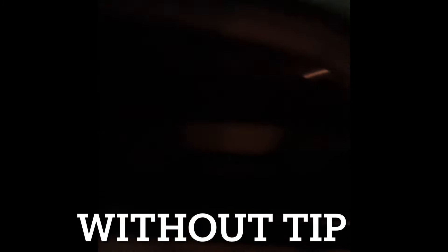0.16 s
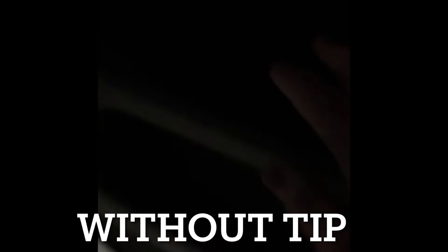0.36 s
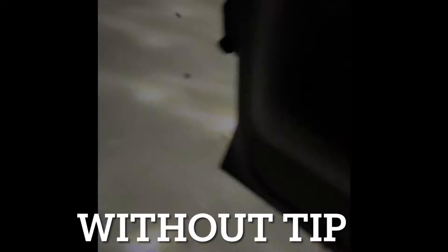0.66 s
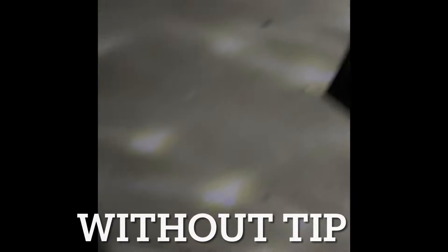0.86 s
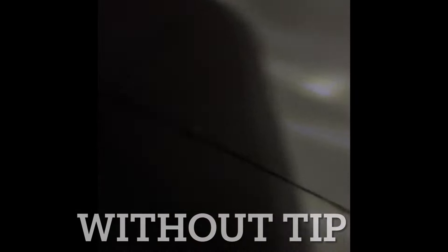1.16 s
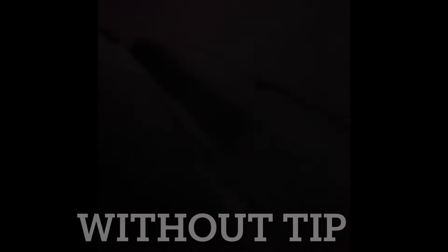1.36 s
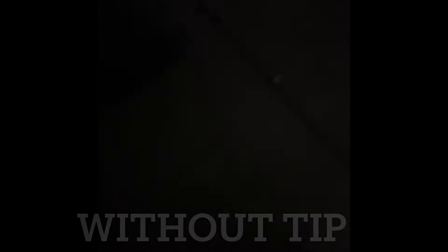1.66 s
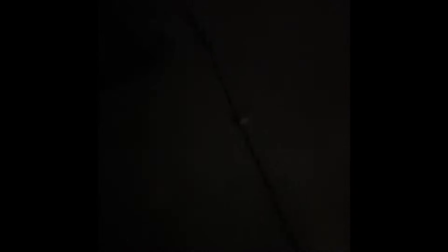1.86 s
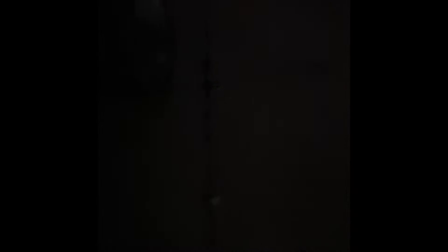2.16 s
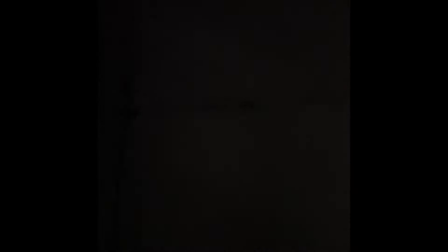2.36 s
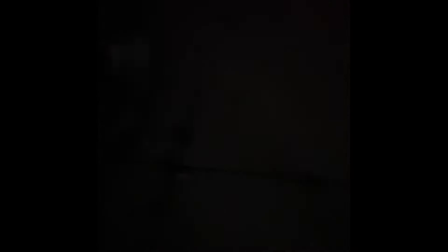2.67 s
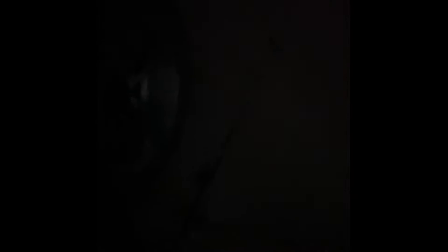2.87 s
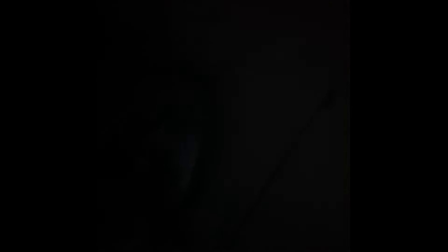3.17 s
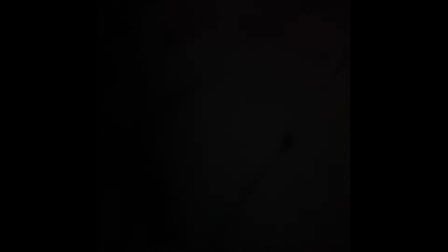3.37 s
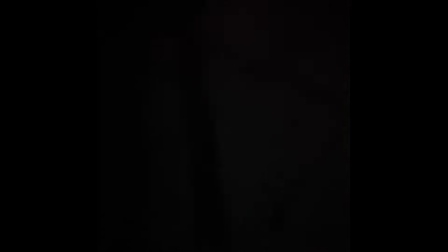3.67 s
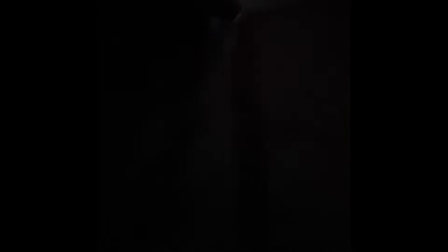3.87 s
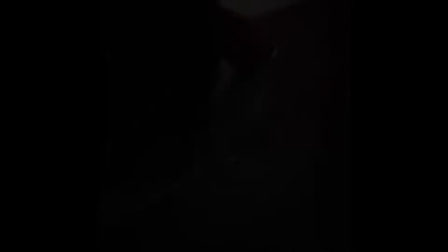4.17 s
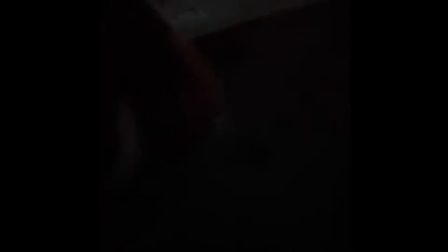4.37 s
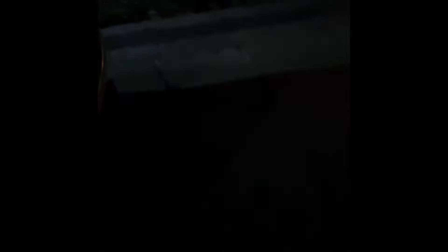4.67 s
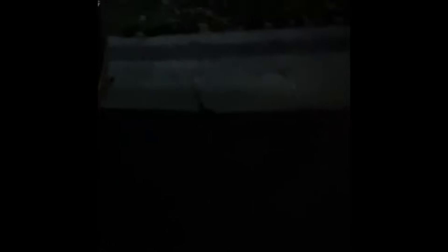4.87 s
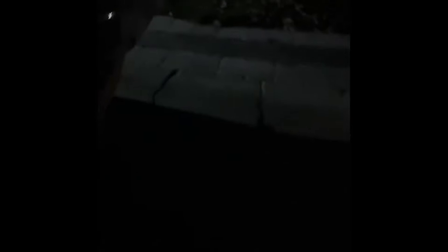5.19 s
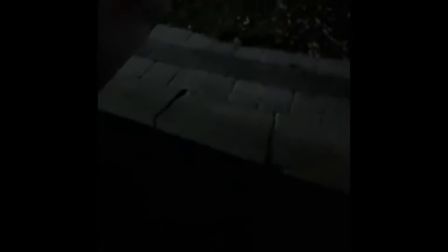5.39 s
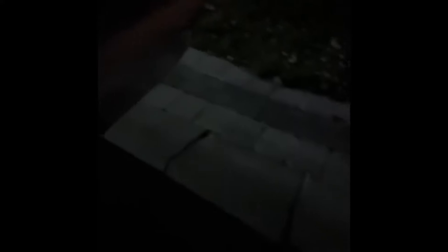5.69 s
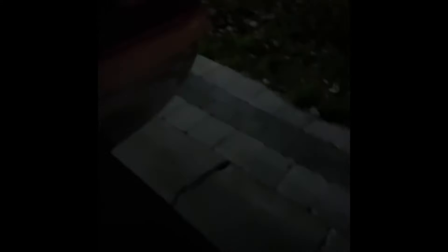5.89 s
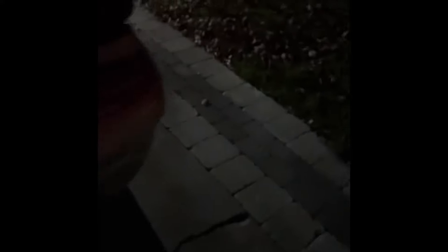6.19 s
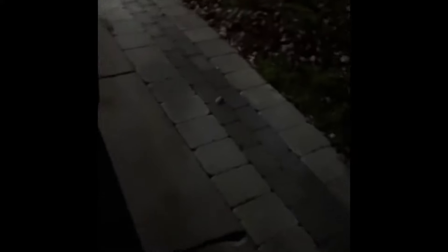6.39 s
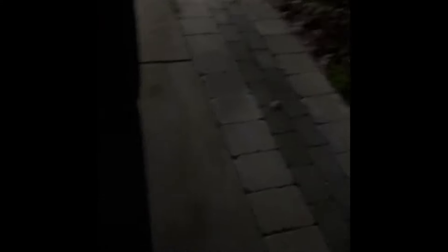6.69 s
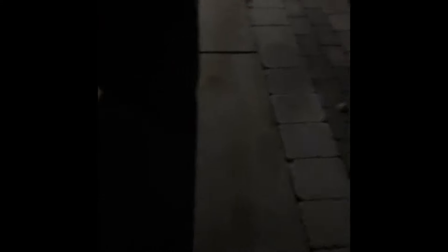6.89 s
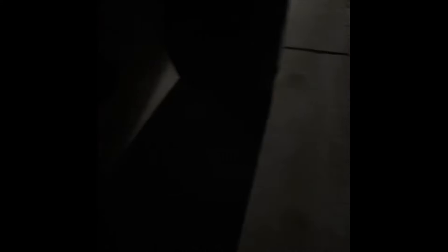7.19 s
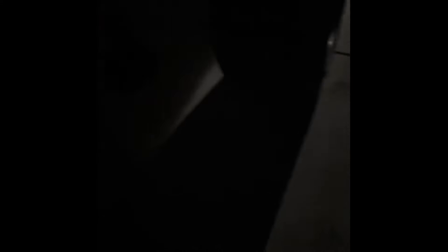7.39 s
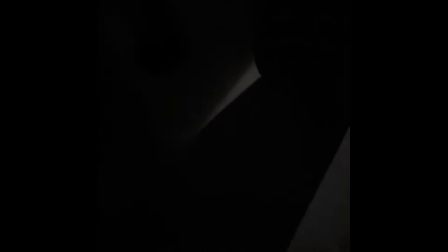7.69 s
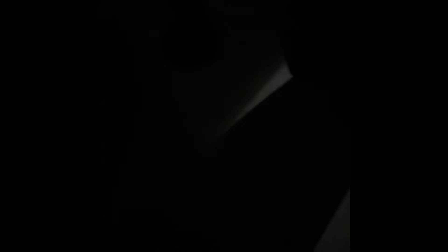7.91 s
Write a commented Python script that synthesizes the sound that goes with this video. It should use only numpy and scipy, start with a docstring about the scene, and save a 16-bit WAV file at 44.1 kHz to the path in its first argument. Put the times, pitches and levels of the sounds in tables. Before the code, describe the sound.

A heavy eight-cylinder diesel truck idles throughout, its firing a fast low throb of about fifty beats a second, hunting slightly. From 0 to 0.7 s it is heard from the cab by an open door: dark, boomy drone, with a brief dry double snap of trim near 0.2 s. Around 0.7 to 1.2 s the listener steps outside; the boom flickers and dips, and the sound opens into airy engine noise. A light metallic valve tick, about seven a second, is clearest near 0.7 s and again around 1.7 to 2.4 s, fading by 3 s. Along the flank, 2 to 5 s, the boom rises and drops while narrow hollow resonances shift. From 5 s the gas rush and clatter grow, strongest around 6 to 7.2 s at the tailpipe, bright, breathy and rough, then ease slightly until 8 s. Close handheld stereo, treble dulled.

```python
"""Idle boom of an eight-cylinder diesel truck, hunting a little in speed, first in the cab, then outside.
The listener walks along the flank to the tailpipe: the boom rises and falls, the rush of gas grows.
Exhaust: sines on multiples of the engine cycle, with rumble and cab drone as filtered noise.
Rush: noise puffed by each firing, combed by an echo off the paving, levelled in four bands.
Under it a valve tick once a cycle, a clatter at each firing and a double snap of cab trim."""
import sys
import numpy as np
from scipy import signal
from scipy.fft import rfft, irfft, next_fast_len
from scipy.io import wavfile
from scipy.ndimage import uniform_filter1d, map_coordinates

SR = 44100
rng = np.random.default_rng(int(sys.argv[2]) if len(sys.argv) > 2 else 0)


def waveform_to_disk(signal):
    """Save audio, clipped to [-1, 1], as 16-bit WAV at the path in sys.argv[1]."""
    frames = np.transpose(np.atleast_2d(signal))
    scaled = np.clip(frames, -1, 1) * 32767
    samples = np.round(scaled).astype(np.int16)
    wavfile.write(sys.argv[1], SR, samples)


N = 355005


def gain_of(db):
    """Decibels to an amplitude factor."""
    return 10 ** (np.asarray(db) / 20)


def evened(x):
    """Scales to rms 1."""
    return x / np.sqrt(np.mean(x ** 2) + 1e-20)


def curves(rows, t=None):
    """Every column of a time table, by default one value a sample."""
    t = np.arange(N) / SR if t is None else t
    row_s, *columns = np.transpose(rows)
    return [np.interp(t, row_s, column) for column in columns]


def read(points, at_hz):
    """Level of a spectrum table, interpolated on log frequency."""
    hz, db = np.transpose(points)
    return np.interp(np.log(at_hz + 1), np.log(hz + 1), db)


def coloured(x, points, turn=1):
    """Filters x by a spectrum table; turn rotates the phase (1j: a quarter turn)."""
    size = next_fast_len(N)
    gain = gain_of(read(points, np.fft.rfftfreq(size, 1 / SR)))
    return irfft(rfft(x, size) * gain * turn, size)[..., :N]


def drift(per_s, t, count):
    """Slow random wander of rms 1: noise at 40 knots a second, averaged twice."""
    knots = rng.standard_normal((count, int(N / SR * 40) + 9))
    width = max(int(20 / per_s), 1)
    knots = uniform_filter1d(uniform_filter1d(knots, width), width)
    return [np.interp(t * 40, np.arange(len(k)), evened(k)) for k in knots]


# listener's place: (time [s], 0 in the cab - 1 outside)
OUTSIDE = [(0, 0.39), (.7, 0.34), (1.15, 0.96), (8.05, 0.97)]
# twice the firing rate, swells and drops out as the listener moves: (time [s], level [dB])
BOOM = [(0, -14), (.13, -11), (.69, -7.5), (.74, -10.5), (.78, -29.5), (.82, -13.5), (.9, -11), (1.0, -11),
        (1.045, -11.5), (1.085, -23), (1.16, -14), (1.19, -14), (1.22, -23.5), (1.35, -18.5), (1.44, -15),
        (1.67, -18.5), (1.8, -12.5), (2.2, -11.5), (2.48, -16), (2.58, -31), (2.72, -25.5), (2.9, -21),
        (3.12, -20), (3.5, -16.5), (3.65, -17.5), (3.87, -23.5), (4.1, -20), (4.33, -21.5), (4.48, -12.5),
        (4.65, -18.5), (5.1, -16), (5.7, -22.5), (6.25, -15.5), (7.1, -21), (7.6, -27.5), (8.05, -26.5)]
# order groups: (time [s], firing rate [dB], uneven low orders [dB], upper orders [dB])
GROUP_LEVELS = [(0, -27, -21, -29), (.1, -16, -20.5, -37), (.6, -20.5, -23, -29.5), (.95, -25, -21.5, -33),
                (1.3, -33.5, -27.5, -30.5), (1.7, -35, -27.5, -31.5), (2.05, -30, -27, -36.5),
                (2.5, -37, -23, -30.5), (2.8, -33, -22.5, -29), (3.3, -33, -25, -34),
                (3.75, -57, -20, -33.5), (4.3, -37, -22.5, -34), (4.8, -34.5, -24.5, -32),
                (5.4, -31, -23, -31.5), (5.8, -32, -22, -28), (6.2, -30, -22, -25), (6.9, -31, -25, -29.5),
                (7.4, -38, -30.5, -38), (8.05, -40, -34.5, -37)]
# quick random swell, rms: [firing rate [dB], low orders [dB], upper orders [dB]]
GROUP_SWELL_DB = [1.0, 0.73, 1.3]
# uneven orders, relative to their group: (multiple of cycle rate, rounded to play, cab [dB], outside [dB])
UNEVEN_ORDERS = [(7, -15, -47), (9, -4, -22), (10, -5.5, -37), (11, -1, -15), (12, -2.5, -9),
                 (13, -0.5, -23), (14, -30.5, -20), (15, -23, -29), (17, -12, -2), (18, -33, -9),
                 (19, 6, -33.5), (20, -24, -11), (21, -11, -8.5), (22, -30, -11.5), (23, -23.5, -44),
                 (24, 2.5, -15), (25, 0, -28), (26, -0.5, -16), (27, 3.5, -27), (28.19, -16, -12.5),
                 (29, 2, -18), (30, -20.5, -8.5), (31, -17.5, -2), (32, 8.5, -12.5), (33, -17, -49),
                 (34, -22, -24.5), (35, -12.5, -7.5), (36, -21, -12.5), (37, -21, -20.5), (38, -16.5, -30),
                 (40, -14, -22.5), (41, -6.5, -24.5), (48, -15.5, -20), (50, -27, -22), (51, -11.5, -17.5),
                 (54, -19, -19.5), (55, -27, -23.5), (58, -32, -27), (59, -18, -24.5), (64.4, -12.5, -23)]
# wavering panel orders, 6.5 dB below: (multiple of cycle rate, level re upper orders [dB])
PANEL_ORDERS = [(39, -22), (43, -20), (47, -22), (52, -20), (53, -20), (60, -16), (65, -20), (69, -22)]
# places that favour or muffle an order: (multiple of cycle rate, middle [s], reach [s], lift [dB])
PLACES = [(31, 1.35, 1.3, -1.5), (17, 3.6, 1.63, -7), (17, 6, 0.48, 1), (26, 0.83, 0.51, 3),
          (30, 1.8, 0.49, 6.5), (59, 2.2, 0.11, 21), (35, 3.86, 0.35, 9), (40, 3.55, .2, 14),
          (40, 5.96, 0.4, 13), (31, 4.3, 0.31, 7), (31, 5.56, 0.33, -1.5), (54, 5.37, 0.58, 13),
          (64, 5.01, 0.77, 15), (30, 2.85, 0.082, 9), (35, 5.04, 0.42, -12), (35, 2.98, 0.53, -8.5),
          (54, 3.5, .2, 10), (59, 2.9, .25, 12), (69, 6.52, 0.32, 15), (32, 2.1, 0.41, 5.5),
          (21, 3.9, .4, 3.5), (20, 1.96, .5, 6), (24, 2.3, .5, 8), (28, 2.1, .5, 10), (18, 2.1, 0.58, -9),
          (21, 2.1, 0.58, -6)]
UPPER_FROM_ORDER = 28
CRANK_TURNS, SPREAD_TURNS = .25, -.235  # linear and quadratic phase across the orders
SLIP_TURNS_PER_DB, WAVER_DB_PER_ORDER = .01, .04


def exhaust_orders(turns):
    """Sines on multiples of the engine cycle; unlike cylinders and pipes feed the uneven ones."""
    t, turns = np.arange(0, N, 10) / SR, turns[::10]  # low tones: a tenth of the samples will do
    boom_db = curves(BOOM, t)[0]
    swells = drift(5.9, t, count=3)
    firing_db, low_db, upper_db = (
        db + size_db * swell for db, size_db, swell in zip(curves(GROUP_LEVELS, t), GROUP_SWELL_DB, swells))
    outside = np.clip(curves(OUTSIDE, t)[0], 0, 1)
    rows = [(16, boom_db, 0.18), (8, firing_db, 0.32)]  # (order, level [dB], waver [dB])
    for order, cab_db, out_db in UNEVEN_ORDERS:
        group_db = low_db if round(order) < UPPER_FROM_ORDER else upper_db
        rows.append((order, group_db + cab_db + outside * (out_db - cab_db), WAVER_DB_PER_ORDER * order))
    rows += [(order, upper_db + db - 6.5, 4.0) for order, db in PANEL_ORDERS]
    sound = np.zeros(len(t))
    wavers, slips = drift(1.96, t, count=len(rows)), drift(1.2, t, count=len(rows))
    for (order, db, waver_db), waver, slip in zip(rows, wavers, slips):
        k = round(order)
        step = k - 16  # the pipe delays each order a little differently
        phase_turns = k * turns + CRANK_TURNS * step + SPREAD_TURNS * step * (step - 1)
        phase_turns = phase_turns + SLIP_TURNS_PER_DB * waver_db * slip
        for at_order, middle_s, reach_s, lift_db in PLACES:
            if round(at_order) == k:
                db = db + lift_db * np.exp(-((t - middle_s) / reach_s) ** 4)
        sound += np.sqrt(2) * gain_of(db + waver_db * waver) * np.cos(2 * np.pi * phase_turns)
    return signal.resample_poly(sound, 10, 1)[:N]


# exhaust rumble outside: (frequency [Hz], density [dB per Hz])
RUMBLE = [(20, -13), (45, -5.5), (60, -3), (100, 19.5), (170, 7), (230, 5.5), (300, -23), (500, -64.5)]
# drone in the cab: (frequency [Hz], density [dB per Hz])
CAB_DRONE = [(10, -2), (30, 17), (80, 11), (180, 29), (260, -6), (500, -56)]
RUMBLE_RE_LOW_ORDERS_DB, CAB_DRONE_DB = -6, -25


def rumble_and_drone():
    """Low filtered noise: rumble follows the low orders outside, a steady drone fills the cab."""
    rumble, drone = rng.standard_normal((2, N))
    low_db, outside = curves(GROUP_LEVELS)[1], np.clip(curves(OUTSIDE)[0], 0, 1)
    rumble = gain_of(low_db + RUMBLE_RE_LOW_ORDERS_DB) * outside * evened(coloured(rumble, RUMBLE))
    return rumble + gain_of(CAB_DRONE_DB) * (1 - outside) * evened(coloured(drone, CAB_DRONE))


# walk: (time [s], nearness to tailpipe [0-1], echo delay [ms], echo strength [0-1], puff depth [0-1])
PATH = [(0, 0.3, 0.38, 0.2, 0.27), (1, 0.16, 3.9, 0.2, 0.12), (3.2, 0.23, 5.3, 0, 0.01),
        (4.3, 0.3, 3.2, 0, 0.12), (5.1, 0.58, 2.05, 0.24, 0.2), (5.5, 0.7, 2.44, 0.4, 0.22),
        (6, 0.73, 2.72, 0.8, 0), (6.5, 0.94, 3.01, 0.5, 0.17), (7, 1, 3.23, 0.85, 0.4),
        (7.5, 1, 3.1, 0.4, 0.1), (8.05, 1, 2.93, 0.5, 0.25)]
PUFF_LEAD_FIRINGS = .15


def puffed_noise(turns):
    """Two unlike noises, puffed by unequal cylinders and doubled by the echo off the paving."""
    _, delay_ms, echo, depth = curves(PATH)
    firing = 8 * turns + PUFF_LEAD_FIRINGS
    cylinder_db = np.array([0.025, 1.8, -0.65, 0.3, -0.4, 1.7, -0.3, -0.8])
    cylinder = gain_of(cylinder_db)[firing.astype(int) % 8]
    puffs = uniform_filter1d(cylinder * np.exp(-(firing % 1) / 0.27), 60)
    noise = rng.standard_normal((2, N)) * (1 + 2.0 * depth * (puffs - puffs.mean()))
    late = np.arange(N) - delay_ms * SR / 1000
    back = np.array([np.interp(late, np.arange(N), n) for n in noise])
    # rough ground scatters the treble: (frequency [Hz], level [dB])
    ground = [(0, -8), (1500, -2.5), (2000, -6), (3200, -11.5), (22050, -43)]
    return noise + echo * coloured(back, ground)


# rush at the open door, before band levelling: (frequency [Hz], density [dB per Hz])
CAB = [(140, -32), (240, -8), (264, -11), (331, 5), (377, -9.5), (564, -3.5), (976, -15.5), (1580, -9),
       (1950, -17), (2490, -14.5), (3550, -25.5), (8340, -29), (11300, -63.5), (14700, -89), (22000, -120)]
# beside the truck, likewise: (frequency [Hz], density [dB per Hz])
FLANK = [(140, -29), (240, -7), (287, 7.5), (377, -1.5), (422, -1.5), (564, -3), (1390, 1), (3120, -15),
         (3610, -12), (4980, -18.5), (7820, -16.5), (9640, -30), (11300, -55), (14700, -67), (22000, -120)]
# behind the truck, likewise: (frequency [Hz], density [dB per Hz])
TAILPIPE = [(140, -35), (240, 7), (296, -15), (436, -9.5), (512, -11), (685, -8), (818, -3), (1170, -1),
            (1920, -1.5), (3120, -14), (3610, -6), (4980, -17.5), (7450, -12), (9190, -25), (11300, -45.5),
            (14700, -65), (22000, -120)]
# ripples of the microphone housing: (frequency [Hz], level [dB])
HOUSING = [(0, -7.5), (3800, 1.5), (4050, -2.5), (4400, 2.5), (4650, 0.5), (4900, -8), (5250, -4),
           (5750, 0.5), (6250, -2), (6600, 1.5), (22050, 6.5)]
# three shifting narrow bands between truck and wall: (time [s], then 3 x centre [Hz], lift [dB])
GAP = [(0, 1570, -5, 2420, -7, 760, 3), (.7, 1570, 4, 2330, 6, 750, 0.5), (1.3, 1630, 2, 2330, 2, 760, 0),
       (1.9, 1670, 11.5, 2330, 6, 1180, 3), (2.2, 1560, 1, 2330, 4, 1120, 2),
       (2.5, 1514, 6, 1910, 10, 1080, 1), (2.75, 1520, 3, 1900, 5, 1060, 7),
       (2.95, 1565, 14.5, 1930, 14, 1080, 1), (3.15, 1490, 5, 1960, 11, 950, 3),
       (3.45, 1366, 10, 1920, 7, 900, 6), (3.65, 1300, -6, 1780, 8.5, 830, 3),
       (4, 1370, 2, 1765, 8, 780, 9), (4.25, 1430, 5, 1980, -1, 1036, 7),
       (4.7, 1620, -9, 1960, 9, 1043, 13), (5.0, 1650, 7, 1960, 4, 1023, 14),
       (5.2, 1350, 7, 1950, 1, 940, 6), (5.55, 1210, 7, 1580, 8, 910, -1),
       (5.9, 1160, 8.5, 1480, 6.5, 725, 1), (6.25, 1140, 7, 1424, 7.5, 706, 4),
       (6.5, 970, 5, 1400, 9, 704, -3), (6.75, 936, 5.5, 1340, 2, 700, 3), (7.1, 940, -6, 1290, 0, 705, -8),
       (7.6, 930, 1, 1370, 4, 664, 5.5), (8.05, 915, 2.5, 1350, 2, 660, -2)]
# length of the reflected paths: (time [s], relative length)
PATH_STRETCH = [(0, 1.0), (5.1, 1.0), (6, 1.3), (7, 1.5), (8.05, 1.46)]
DOOR_SHADE_S = 0.23  # the open door still screens the rush for a step
GAP_HALF_WIDTH_HZ = 38


def rush_colour_db(hz, t):
    """Spectrum over time: place along the truck, housing, wall gap and small reflections."""
    near = np.clip(curves(PATH, t)[0], 0, 1)
    outside = np.clip(curves(OUTSIDE, t - DOOR_SHADE_S)[0], 0, 1)
    cab, flank, tail = (read(points, hz)[:, None] for points in (CAB, FLANK, TAILPIPE))
    db = (1 - outside) * cab + outside * ((1 - near) * flank + near * tail)
    db += read(HOUSING, hz)[:, None]
    gap = curves(GAP, t)
    for centre_hz, lift_db in zip(gap[::2], gap[1::2]):
        db += lift_db * np.exp(-((hz[:, None] - centre_hz) / GAP_HALF_WIDTH_HZ) ** 2)
    # small reflections: narrow bands swell and fade, and slide down as the paths lengthen
    patches = rng.standard_normal((len(t), 2 * len(hz)))
    patches = uniform_filter1d(uniform_filter1d(patches, 32, 0), 20, 0).T
    slid = np.arange(len(hz))[:, None] * np.clip(curves(PATH_STRETCH, t)[0], .5, 2)
    frames = np.arange(len(t)) + 0 * slid
    patches = map_coordinates(patches, [slid, frames], order=1, mode="nearest")
    # swing away from the tailpipe: (frequency [Hz], rms [dB])
    swing_db = read([(0, 1.6), (800, 3.7), (2500, 4.06), (5000, 3.4), (22050, 2.0)], hz)[:, None]
    return db + evened(patches) * (1 - 0.32 * near) * swing_db


# band levels: (time [s], engine-bay roar [dB], rush of gas [dB], top hiss [dB], low wash [dB],
# left-right lean, plus is left [dB])
WALK = [(0, -39, -40, -46, -37, -1.5), (.15, -33, -38.5, -43, -30.5, -1), (.55, -37, -37, -42.5, -34, -1),
        (.8, -34, -38, -43, -36, -1.5), (1.4, -31.5, -38.5, -42, -35.5, -2),
        (1.75, -29.5, -33, -36, -34.5, -1.5), (2.35, -28, -32.5, -36.5, -35, -1),
        (2.6, -30.5, -36.5, -39, -40.5, 1.5), (2.8, -29, -35, -39, -37, 1),
        (3.45, -26, -33.5, -37, -31, 1.5), (3.95, -26.5, -33, -35, -38.5, 2),
        (4.2, -27.5, -34.5, -37, -34, -2), (4.58, -28.5, -35.5, -38, -33.5, 0),
        (4.85, -22.5, -32, -35, -34.5, -1), (5.3, -23, -30, -32, -33.5, -1.5),
        (5.8, -19, -24, -28.5, -34, -0.5), (6.3, -17, -25, -27.5, -30.5, -1),
        (6.8, -18.5, -20, -23, -33.5, 0), (7.25, -19, -21.5, -23.5, -35, 0.5),
        (7.42, -22, -23.5, -26, -33.5, -0.5), (7.6, -22.5, -26.5, -27.5, -38.5, 0),
        (8.05, -23.5, -26.5, -28.5, -38, -0.5)]
# own flicker of each band, rms: [wash [dB], roar [dB], gas [dB], hiss [dB]]
BAND_FLICKER_DB = [1, 0.4, 0.55, 0.18]
# swell once a cycle, one cylinder blows harder: (frequency [Hz], peak [dB])
LOPE = [(500, -0.1), (1500, 0.5), (3500, 0), (7000, 0.57)]
LOPE_TURN = 0.69


def rush(turns):
    """Gas and engine noise, coloured by the place, held to four band levels; two unlike draws."""
    hz, t, z = signal.stft(puffed_noise(turns), SR, nperseg=1024, noverlap=768)
    colour_db = rush_colour_db(hz, t)
    z *= gain_of(colour_db)
    flicker_db = 0.6 * drift(7, t, count=1)[0]  # the idle is never quite steady
    cycle = np.interp(t * SR, np.arange(N), turns)
    lope_db = read(LOPE, hz)[:, None] * np.cos(2 * np.pi * (cycle - LOPE_TURN))
    edges_hz = np.array([0, 700, 2300, 5050, SR])
    power = uniform_filter1d((abs(z) ** 2).mean(0), 60)  # slow, so that each band keeps to its level
    roar_db, gas_db, hiss_db, wash_db, _ = curves(WALK, t)
    own_db = np.array(drift(6., t, count=4)) * np.array(BAND_FLICKER_DB)[:, None]
    levels_db = own_db + [wash_db, roar_db, gas_db, hiss_db]
    lift = np.zeros(colour_db.shape)
    for lo_hz, hi_hz, level_db in zip(edges_hz, edges_hz[1:], levels_db):
        band = (hz >= lo_hz) & (hz < hi_hz)
        present_db = 10 * np.log10(power[band & (hz > 250)].sum(0) * 4 / 3)
        lift[band] = level_db + flicker_db - present_db
    z *= gain_of(uniform_filter1d(lift, size=5, axis=0) + lope_db)
    return signal.istft(z, SR, nperseg=1024, noverlap=768)[1][:, :N]


# engine speed: (time [s], engine cycles per second [1/s])
SPEED = [(0.0, 7.012), (0.24, 7.066), (0.62, 6.93), (0.81, 6.58), (1.0, 6.761), (1.28, 6.566),
         (1.46, 6.701), (1.65, 6.618), (1.88, 6.811), (2.42, 6.738), (2.64, 6.47), (3.1, 6.497),
         (3.3, 6.594), (3.7, 6.636), (4.5, 6.616), (4.7, 6.573), (5.85, 6.537), (6.15, 6.627), (7.1, 6.606),
         (8.05, 6.566)]
# clatter of the firings: (time [s], level [dB])
KNOCK_DB = [(0, -48), (.6, -45), (1, -49), (2.4, -43), (4.5, -49.5), (6, -38), (7.2, -38), (8.05, -40.5)]
# colour of the knock: (frequency [Hz], level [dB])
BLOCK = [(300, -16), (700, -1), (1300, -2), (2600, -0.5), (4000, -6.5), (7000, -15), (10000, -44.5)]
KNOCK_T60_S, KNOCK_SPREAD_DB = 0.016, 1.5


def knock(turns):
    """Each firing raps the block: a short decaying noise burst of slightly random size."""
    firing = 8 * turns + PUFF_LEAD_FIRINGS
    since_s = firing % 1 / (8 * curves(SPEED)[0])
    size_db = KNOCK_SPREAD_DB * rng.standard_normal(int(firing[-1]) + 1)[firing.astype(int)]
    burst = gain_of(size_db - 60 * since_s / KNOCK_T60_S) * rng.standard_normal(N)
    return gain_of(curves(KNOCK_DB)[0]) * evened(coloured(burst, BLOCK))


# ringing modes: (frequency [Hz], level [dB], t60 [s])
TAPPET = [(2330, 3, 0.03), (2380, -2.5, .02), (2665, 3, 0.027), (2800, -1, 0.022)]
# strike level: (time [s], level [dB])
TAPPET_DB = [(0, -33), (.3, -25.5), (.7, -19), (1.1, -29), (1.35, -36), (1.7, -20), (2.4, -24), (3, -49),
             (8.05, -64)]
TAPPET_TURN = .86


def tappet(turns):
    """A valve struck once a cycle rings in a few damped modes."""
    t = np.arange(1500) / SR
    struck = np.diff(np.floor(turns - TAPPET_TURN), prepend=-1)
    strikes = struck * gain_of(curves(TAPPET_DB)[0] + 0.8 * rng.standard_normal(N))
    ring = sum(gain_of(db - 60 * t / t60_s) * np.sin(2 * np.pi * hz * t) for hz, db, t60_s in TAPPET)
    ring *= 1 - np.exp(-t / 0.003)  # heard through the bulkhead, the blow starts softly
    return signal.oaconvolve(strikes, ring)[:N]


# double snap, before trim and colour: (time [s], level [dB])
SNAPS = [(0.1742, -17), (0.178, -16.5)]


def trim_snap():
    """Cab trim snaps twice: noise grains that decay 60 dB in 26 ms, then are coloured."""
    t, snap = np.arange(1500) / SR, np.zeros(N)
    for (at_s, db), grain in zip(SNAPS, rng.standard_normal((len(SNAPS), 1500))):
        snap[round(at_s * SR):][:1500] += gain_of(db - 7.5 - 60 * t / 0.026) * grain
    # (frequency [Hz], level [dB])
    trim = [(0, -22), (1500, -8), (2600, 14.0), (3500, 4.0), (6000, -2), (9000, -20), (22050, -40)]
    return coloured(snap, trim)


# width beside the truck, before the mix shares: (frequency [Hz], side over mid [dB])
WIDTH_FLANK = [(60, -26.5), (130, -18), (300, -9.5), (600, -2), (1000, -7.5), (1900, -7), (3300, 1),
               (5000, -4), (7700, -13), (10900, 3)]
# width behind the truck, likewise: (frequency [Hz], side over mid [dB])
WIDTH_TAILPIPE = [(60, -27.5), (200, -35), (340, -16.5), (600, -3.5), (1100, -9.5), (1900, -53),
                  (2500, -3.5), (3400, 3.5), (4100, -8.5), (5000, 15), (7700, -2.5), (10900, 15)]
# the hand turns the ports across or along the sound: (time [s], width [dB])
TURNING = [(0, 1.5), (.9, 1.5), (1.15, 7), (1.5, 1.5), (2.4, 0.5), (2.7, 5.5), (4.1, 4), (4.4, -1), (6, -2),
           (7, -4.5), (8.05, -8)]
# how far each band follows the lean: (frequency [Hz], level [dB])
LEAN = [(200, -28), (500, 3), (1000, 13.5), (3500, 0), (5000, 13), (9000, -14)]
# band favouring the left behind the truck: (frequency [Hz], level [dB])
TAIL_LEAN = [(2000, -44), (2800, -17.5), (4500, -10), (5200, -36.5)]
# band kept nearly the same left and right: (frequency [Hz], side level [dB])
NARROWED_BAND = [(0, 0), (5150, 0), (5400, -30), (7400, -30), (7600, 0), (22050, 0)]


def scene():
    """Two close microphone ports: the difference is partly the same sound out of phase, partly unrelated."""
    turns = np.cumsum(curves(SPEED)[0]) / SR
    same, other = rush(turns)
    low = exhaust_orders(turns) + rumble_and_drone()
    mid = same + low + tappet(turns) + trim_snap() + knock(turns)
    near, lean_db = np.clip(curves(PATH)[0], 0, 1), curves(WALK)[-1]
    turning = gain_of(curves(TURNING)[0])
    side = 0
    for share, width in ((1 - near, WIDTH_FLANK), (near, WIDTH_TAILPIPE)):
        spread = 0.46 * coloured(mid, width, turn=1j) + 0.58 * coloured(other, width)
        side = side + share * turning * spread
    side = side + np.tanh((lean_db + 1.3) / 21.6) * coloured(same, LEAN)
    side = side + near * coloured(same, TAIL_LEAN)
    side = coloured(side, NARROWED_BAND) - 0.029 * low
    return np.array([mid + side, mid - side])


EDGE_HZ = 11480


def record(dry):
    """Soft overload on the tallest peaks, then the band limit."""
    loud = 1.137 * dry
    soft = loud / (1 + (loud / .96) ** 4) ** .25
    lowpass = signal.firwin(511, EDGE_HZ, window=("kaiser", 9), fs=SR)
    return signal.oaconvolve(soft, lowpass[None], "same")


dry = scene()
out = record(dry)
waveform_to_disk(out)
```